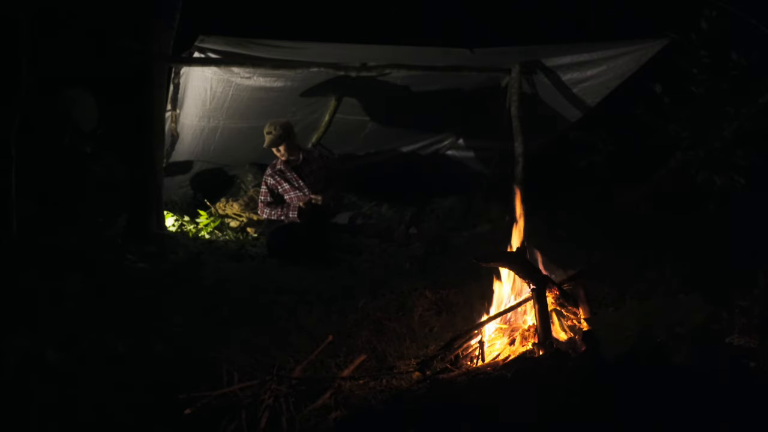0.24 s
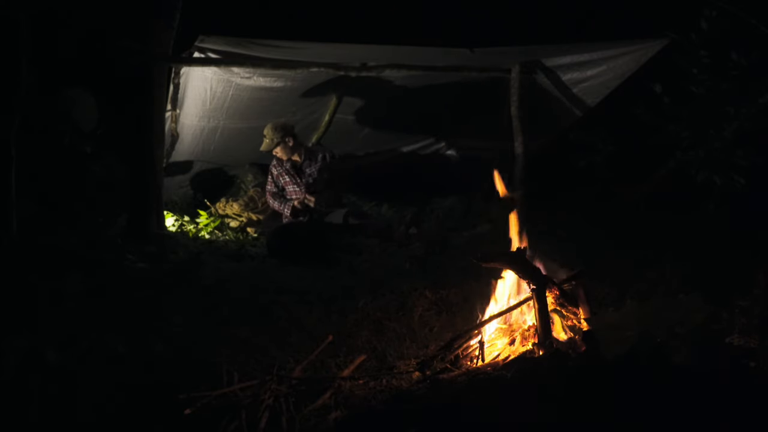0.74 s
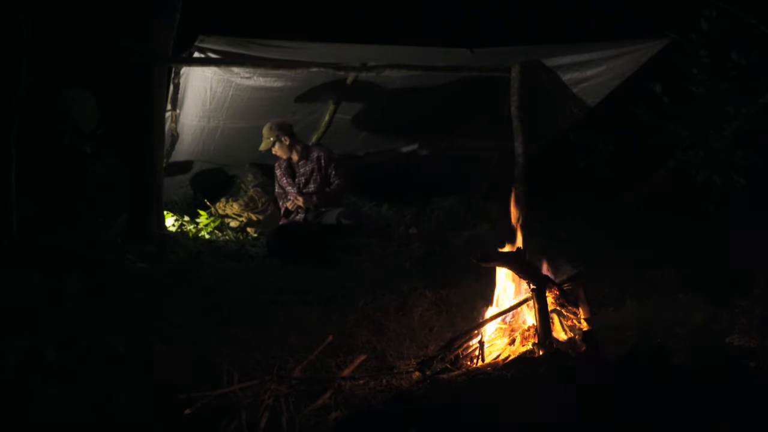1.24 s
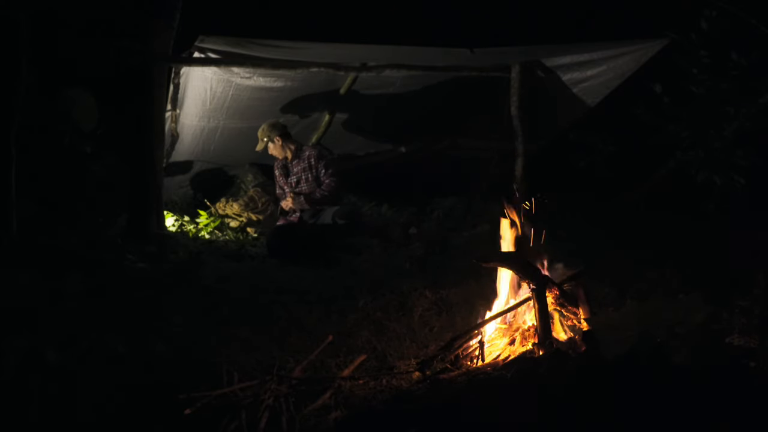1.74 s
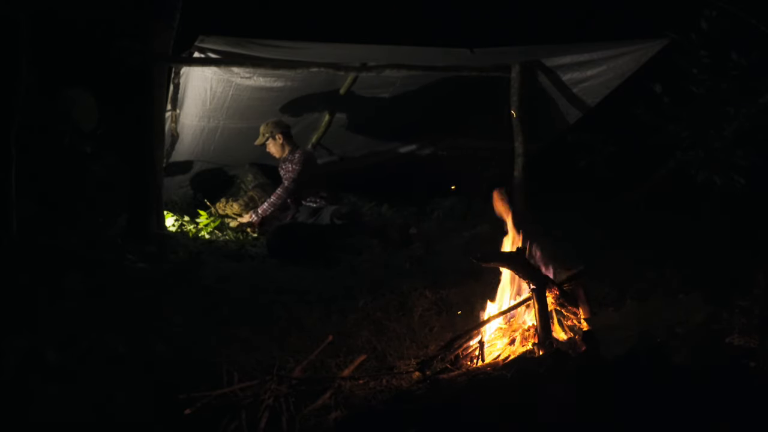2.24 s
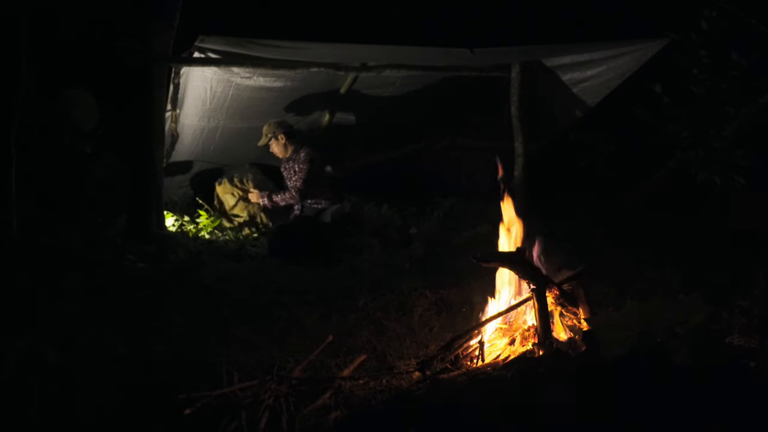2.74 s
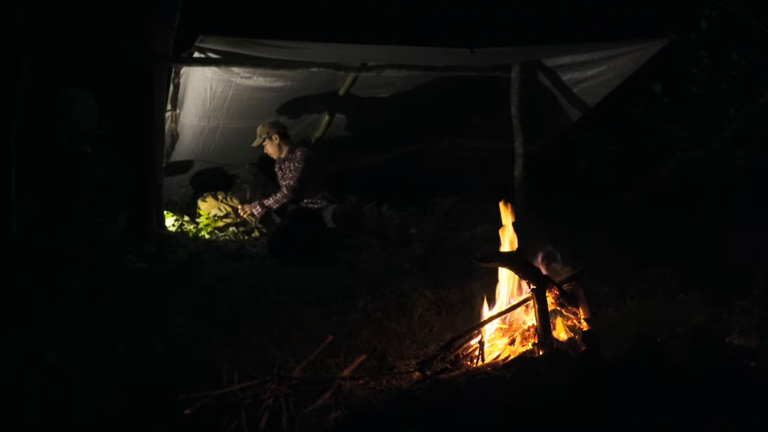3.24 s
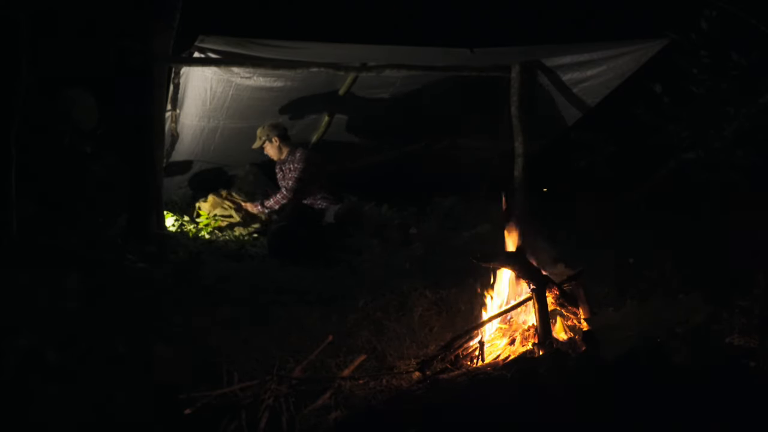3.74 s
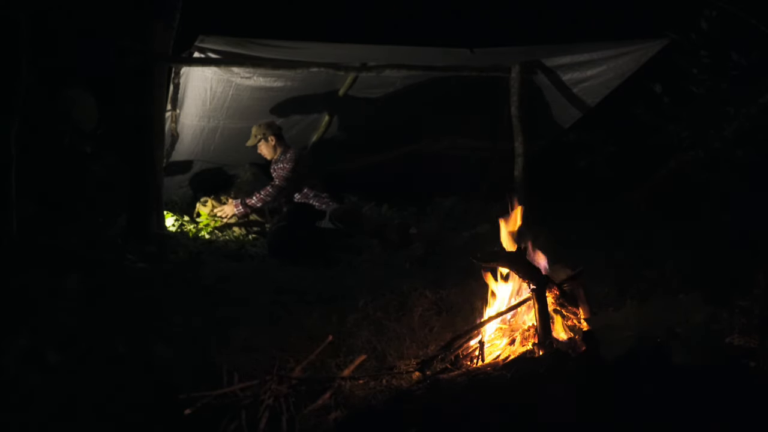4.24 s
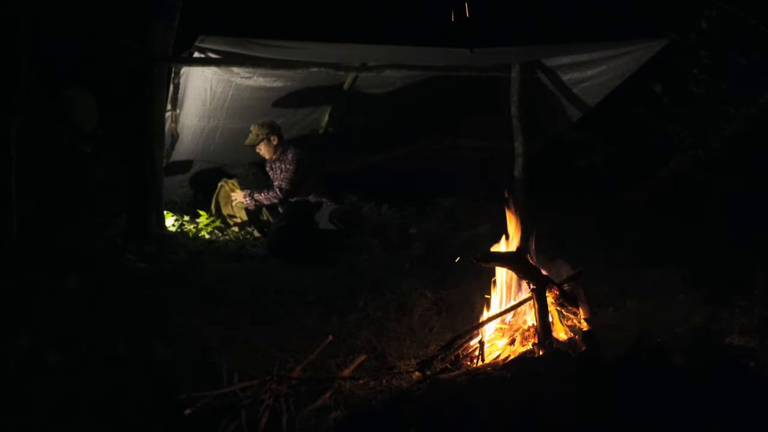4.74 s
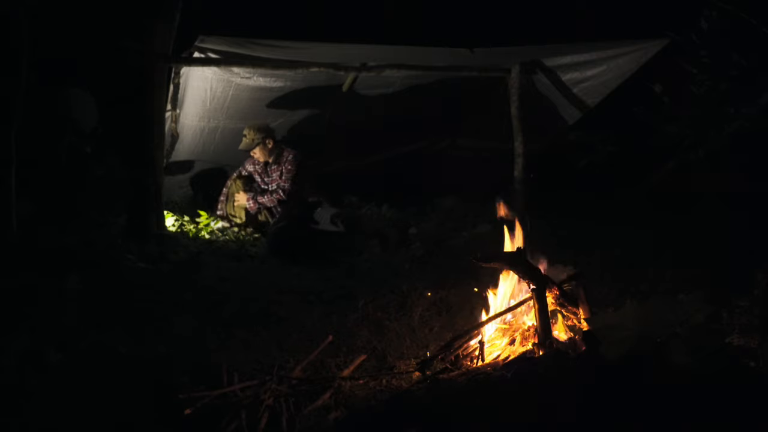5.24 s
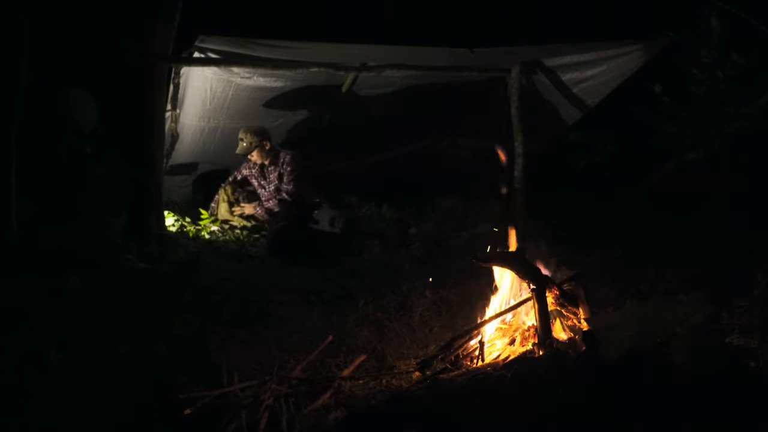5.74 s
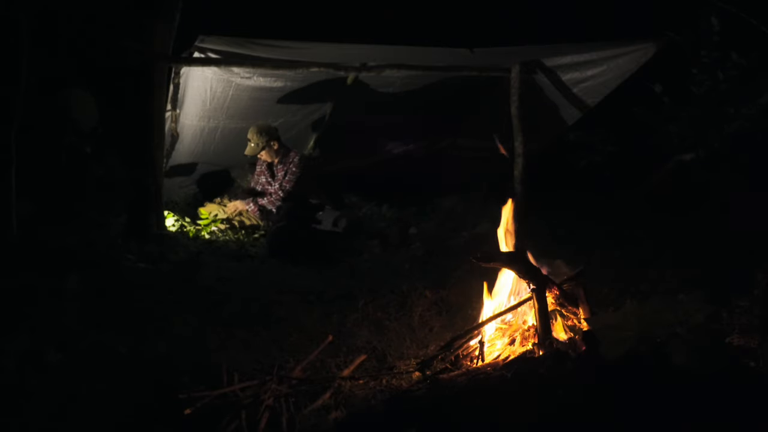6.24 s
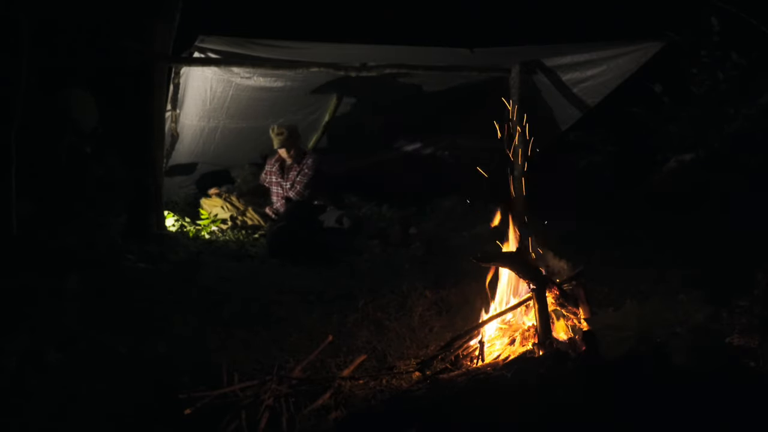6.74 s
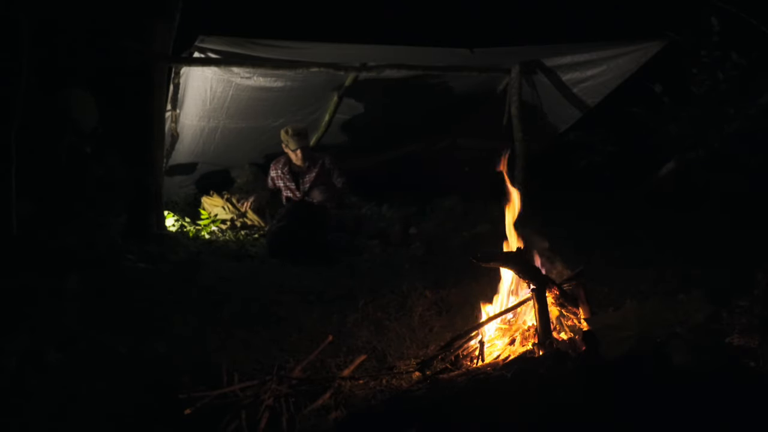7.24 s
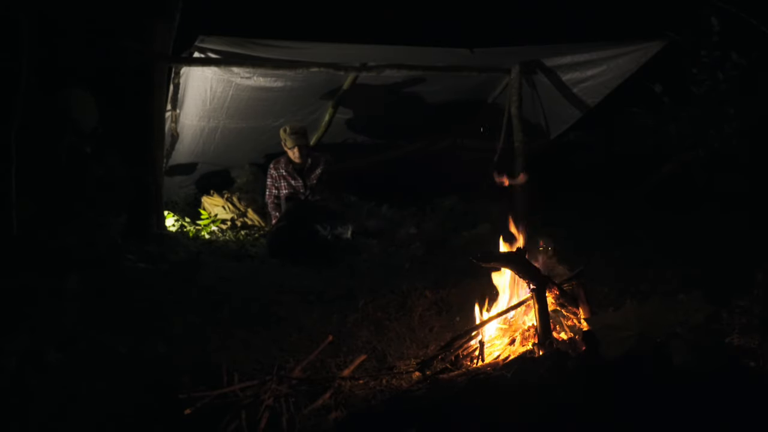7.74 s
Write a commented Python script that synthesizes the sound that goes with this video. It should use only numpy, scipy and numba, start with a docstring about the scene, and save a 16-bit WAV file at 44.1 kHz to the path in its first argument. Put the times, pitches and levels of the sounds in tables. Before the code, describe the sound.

A quiet night in the woods, with the microphone close to a wood fire. Throughout, many crickets sing: a distant high band, pulsing choirs and a nearer chirper, over faint air and flame hiss. Short bright trills stand out near 1.1, 1.5, 3.6, 5.2 and 5.9 s. Fire pops are dry and millisecond-short, with strong ones at 1.1, 1.36, 1.6, 4.3 and 6.66 s, smaller cracks and ticks between. Bag handling is faint until about 2.3 s, then cloth and leaves rustle in uneven clumps, busiest from 4.3 to 6 s. Soft dull thuds fall around 3.1, 3.5, 4.1, 5.3 and 6.2 s. At 6.31 s a hard hollow object smacks down in a rapid stuttering contact, the loudest bump, and its contents rattle and slide for a fraction of a second. Lighter rustles, small bumps and pops continue to 8 s. Tarp and trunks give a short diffuse echo.

```python
"""Night woods, fire and bag

Under a tarp in the woods, with a wood fire popping close to the microphone: noise bursts in four bands.
A cloth bag on leaf bedding rustles (grains) and thuds (noise lumps); a hard thing in it smacks down (modes).
Crickets near and far sing in strokes of falling tones, over a noise bed of air, flame and hiss.
Trees and tarp send back a short diffuse echo of every blow, made with a decaying noise tail."""
import sys
import numpy as np
from scipy import signal
from scipy.fft import rfft, irfft
from scipy.io import wavfile
from numba import njit

SR = 44100
rng = np.random.default_rng(int(sys.argv[2]) if len(sys.argv) > 2 else 0)


def materialize(psi):
    """Save the field psi as 16-bit PCM at rate SR to the path in sys.argv[1].

    A 1-D psi becomes a single channel; in a 2-D psi each row is a channel.
    """
    bounded = np.clip(np.atleast_2d(psi).T, -1, 1)
    quanta = np.round(bounded * 32767).astype(np.int16)
    wavfile.write(sys.argv[1], SR, quanta)


N = 352359

# air, flame and hiss: f/Hz, relative density/dB per Hz
NIGHT_SPECTRUM = [(20, -12), (50, -4), (120, 5.5), (300, 2.5), (1500, -11), (4000, -9.5), (7000, -7),
                  (12000, -19), (16000, -11.5)]
NIGHT_DB = -68.5   # rms before its slow drift
# countless far crickets melted into a band: low f/Hz, high f/Hz, rms level/dB
FAR_CRICKETS = (4360, 5480, -66)
# thin, high patches of hiss: t/s, length/s, centre f/Hz, rms level before the swell/dB
HISS_PATCHES = [(0.0, 0.077, 10800, -66), (0.075, 0.2, 10700, -68.5), (0.322, 0.11, 12700, -64.5),
                (0.44, .1, 12100, -68), (6.136, 0.15, 11200, -69)]
PATCH_HALF_WIDTH = .1   # share of the centre frequency
# cricket choirs: singers, wing f/Hz, spread to either side/Hz, strokes/s, stroke/s, glide/Hz, rms level/dB
CRICKET_CHOIRS = [(7, 3400, 50, 48, 0.018, 62, -61), (8, 4800, 320, 28.5, .011, 300, -70),
                  (2, 5230, 40, 28.5, .012, 460, -71.5), (4, 6210, 59, 74, 0.015, 44, -70),
                  (3, 6630, 33, 57, .014, 40, -73)]
# near cricket, strokes in groups: f/Hz, strokes/s, chirps/s, stroke/s, rms level/dB
NEAR_CHIRPER = (5705, 38.8, 9.7, .0205, -65.5)
# short trills of single crickets: t/s, length/s, starting f/Hz, rms level before shaping and scatter/dB
TRILLS = [(0.41, 0.11, 6200, -60), (1.005, 0.047, 6300, -58), (1.116, 0.15, 6390, -52.5),
          (1.53, .15, 6360, -48.5), (1.896, 0.14, 6200, -63), (3.587, 0.2, 6370, -51),
          (3.845, 0.078, 6470, -51), (5.199, 0.16, 6390, -53), (5.784, 0.07, 6100, -54),
          (5.897, 0.16, 6260, -50), (6.12, 0.085, 6370, -52.5), (6.82, 0.12, 6360, -53),
          (6.83, 0.13, 6520, -61), (7.8, 0.14, 6410, -53)]
SMEAR_S, SMEAR_SHARE = .03, 0.29   # decay constant and gain of the scatter off trunks and leaves
# how hard the bag is handled: t/s, rustle level/dB (only the departure from the mean counts)
BAG_HANDLING = [(0.0, -69.5), (0.87, -68.5), (1.51, -67.5), (2.2, -70.5), (2.32, -62.5), (2.49, -63),
                (2.91, -62), (3.3, -63.5), (3.69, -61.5), (3.94, -60), (4.2, -68), (4.36, -56), (4.46, -65),
                (4.6, -56), (4.75, -60.5), (4.88, -59.5), (4.93, -66), (5.2, -64), (5.35, -55.5),
                (5.5, -61), (5.78, -59), (5.97, -61.5), (6.05, -66.5), (6.3, -65), (6.45, -63),
                (6.81, -66.5), (7.2, -61), (7.5, -70.5), (7.8, -62), (7.99, -63)]
# cloth rustle: f/Hz, relative density/dB per Hz
CLOTH_SPECTRUM = [(35, -39.5), (60, -19), (155, -4), (484, -2.5), (629, -0.5), (794, -9), (874, -5),
                  (1600, -11.5), (2080, -53.5), (3520, -120)]
CLOTH_DB, LEAVES_DB, HISS_DB = -68, -66, -71   # at mean handling; the cloth before its clumps
CLOTH_FOLLOWS, LEAVES_FOLLOW, HISS_FOLLOWS = 1.57, 1.22, 0.95   # dB per dB of handling
# bag against ground and gear: t/s, peak level of the body/dB, body f/Hz, length/s
BAG_THUDS = [(0.625, -54, 350, 0.0091), (2.452, -47.5, 300, 0.011), (2.555, -48.5, 350, 0.039),
             (2.735, -49.5, 427, 0.11), (3.066, -44, 460, 0.093), (3.109, -33, 676, 0.021),
             (3.332, -48, 400, 0.034), (3.416, -48.5, 464, 0.021), (3.492, -36, 755, 0.015),
             (4.036, -42, 666, 0.028), (4.08, -33, 800, 0.014), (4.546, -41.5, 513, 0.013),
             (4.576, -49, 650, 0.01), (4.821, -52, 580, 0.1), (4.874, -47, 2520, 0.035),
             (5.152, -49, 600, 0.0065), (5.213, -45, 596, 0.024), (5.256, -42, 645, 0.095),
             (5.301, -35.5, 590, 0.046), (5.50, -38, 523, 0.0087), (6.233, -34.5, 456, 0.022),
             (6.25, -33, 433, 0.021), (6.789, -49.5, 252, 0.019), (7.079, -44.5, 470, 0.034),
             (7.132, -41.5, 557, 0.02), (7.292, -55, 260, 0.031), (7.757, -41, 552, 0.011)]
SNAP_DB, SNAP_DB_PER_DOUBLING = -8.5, 3.5   # snap of a 20 ms contact; a longer one drags over more leaves
# a hard hollow thing lands unevenly: t/s, level/dB
SMACK_CONTACTS = [(6.312, -25.5), (6.3143, -18.5), (6.3171, -10.5), (6.3196, -14)]
# what it rings with: f/Hz, level relative to the contact/dB, t60/s
HOLLOW_MODES = [(150.2, -18, 0.041), (306, -4, 0.036), (629, -9.5, 0.022), (800, -12.5, 0.039),
                (995, 3, 0.013), (1317, -12, 0.0236), (2064, -11.5, 0.024), (2225, -6, .03),
                (2460, -11.5, 0.025), (3070, -8, 0.0087), (3540, -11.5, 0.01), (4180, -9, 0.0058),
                (5360, -8.5, 0.003)]
# after the smack the contents jolt, slide on for a while and come to rest
JOLT_S, JOLT_DB, JOLT_T60_S = 6.322, -36.5, 0.073
SLIDE_DB, SLIDE_S, REST_DB_PER_S = -51, 0.093, 124.5
# fire pops: t/s, peak level of the top band before the shared colour/dB, brightness/dB per octave
FIRE_POPS = [(0.1703, -50, 12), (0.2227, -43.5, 4.5), (0.3502, -34.5, 1), (0.5918, -44.5, 9),
             (0.7267, -46, 4), (1.0522, -38.5, 5.5), (1.1042, -19, 1.13), (1.2971, -34.5, 12),
             (1.36, -13, 2.4), (1.4161, -32, 1.5), (1.5971, -14, 5.5), (1.7275, -29.5, 2), (1.9293, -24, 7),
             (1.945, -38, 11), (2.0568, -41.5, 5.5), (2.754, -36, 6), (3.4424, -27, 3), (3.611, -42, 10),
             (3.8301, -40, -0.5), (3.924, -31.5, 5), (4.1391, -28.5, 6.5), (4.3144, -17, 1.83),
             (4.6669, -21.5, 6), (5.4555, -21.5, 4.5), (5.5946, -43, -4), (5.616, -43, 9), (5.678, -32, 5),
             (5.942, -43, 3), (6.273, -34.5, 3), (6.6292, -30.5, 6), (6.6565, -13, 3), (7.0575, -30.5, 5.5),
             (7.082, -37.5, 5.5), (7.4694, -40.5, -1), (7.4751, -27.5, 2), (7.6632, -28, 5.5),
             (7.713, -41, 3.5)]
# bands of a pop: low f/Hz, high f/Hz
POP_BANDS = [(300, 1450), (1600, 3200), (4300, 7000), (7000, 13000)]
# colour all pops share: level/dB, one per band
POP_COLOUR = [-0.6, 1, -2, -0.9]
GROUND_S, GROUND_SHARE = .00031, 0.05   # delay and gain of each pop's inverted ground bounce
ECHO_DB, ECHO_T60_S, ECHO_WAIT_S = -8.5, 0.28, .013   # t60 before the further fades
TREBLE_FADE_S = 0.27   # extra fade of the echo's treble, to about a third in this time
CUTOFF_HZ = 16600


def from_db(db):
    """Decibels to gain."""
    return 10 ** (np.asarray(db) / 20)


def rms_one(x):
    """Scale to rms 1."""
    return x / np.sqrt(np.mean(x ** 2) + 1e-20)


def peak_one(x):
    """Scale each row to peak 1."""
    return x / np.abs(x).max(axis=-1, keepdims=True)


def in_time(rows):
    """Columns of a curve, one value per sample."""
    s, *columns = np.transpose(rows)
    return [np.interp(np.arange(N) / SR, s, c) for c in columns]


def band(x, low_hz, high_hz):
    """Butterworth band-pass."""
    edges_hz = [low_hz, min(high_hz, .45 * SR)]
    return signal.sosfilt(signal.butter(2, edges_hz, "band", fs=SR, output="sos"), x)


def coloured(x, spectrum):
    """Shape a steady signal to a spectrum, interpolated over log frequency; rms 1."""
    hz, level_db = np.transpose(spectrum)
    grid = np.log(np.fft.rfftfreq(N, 1 / SR) + 1)
    gain = from_db(np.interp(grid, np.log(hz), level_db))
    return rms_one(irfft(rfft(x) * gain, N))


def drift(rate):
    """Slow random curve: knots of spread 1, so many per second, joined by straight lines."""
    knots = rng.standard_normal(int(N / SR * rate) + 2)
    return np.interp(np.arange(N) / SR * rate, np.arange(len(knots)), knots)


def grains(per_s, spread_db):
    """Random clicks of either sign; a larger spread makes their sizes more uneven."""
    size_db = spread_db * np.minimum(rng.exponential(1, N), 4)
    sizes = from_db(size_db) * rng.choice([-1, 1], N)
    return sizes * (rng.random(N) < per_s / SR)


def place(out_len, events):
    """Lay short sounds at their times."""
    out = np.zeros(out_len + SR)
    for s, sound in events:
        start = round(s * SR)
        out[start:start + len(sound)] += sound
    return out[:out_len]


def night_air():
    """Air, flame and hiss: coloured noise whose level drifts slowly."""
    level = from_db(NIGHT_DB + 0.74 * drift(3.5))
    return level * coloured(rng.standard_normal(N), NIGHT_SPECTRUM)


def far_crickets():
    """So many distant singers that their strokes merge into a steady band of noise."""
    low_hz, high_hz, level_db = FAR_CRICKETS
    far = band(band(rng.standard_normal(N), low_hz, high_hz), low_hz, high_hz)
    return from_db(level_db) * rms_one(far)


def high_hiss():
    """Each patch is a narrow band of noise that swells and fades."""
    t = np.arange(SR // 2) / SR
    patches = []
    for s, length_s, hz, level_db in HISS_PATCHES:
        swell = np.sqrt(np.sin(np.pi * np.clip(t / length_s, 0, 1)).clip(0))
        noise = rng.standard_normal(len(t))
        hiss = rms_one(band(noise, hz * (1 - PATCH_HALF_WIDTH), hz * (1 + PATCH_HALF_WIDTH)))
        patches.append((s, from_db(level_db) * swell * hiss))
    return place(N, patches)


@njit
def wing(pace, hz, per_s, stroke_s, glide_hz):
    """Each wing stroke is a short tone falling in pitch; pace is the singer's own clock in seconds."""
    out, phase = np.zeros(len(pace)), 0.
    for i in range(len(pace)):
        through = pace[i] * per_s % 1 / (per_s * stroke_s)   # 0 to 1 within the stroke
        if through < 1:
            phase += 2 * np.pi * (hz[i] + glide_hz * (.5 - through)) / SR
            out[i] = np.sin(phase) * np.sqrt(4 * through * (1 - through))
    return out


def strokes(hz, per_s, stroke_s, glide_hz):
    """A singer whose tempo and pitch waver a little; also returns its clock."""
    pace = rng.random() + np.arange(N) / SR + .003 * drift(4)
    return wing(pace, hz + 14 * drift(25), float(per_s), stroke_s, float(glide_hz)), pace


def smear(x):
    """A dense short scatter off trunks and leaves fills the gaps between strokes."""
    t = np.arange(SR // 8) / SR
    scatter = rms_one(rng.standard_normal(len(t)) * np.exp(-t / SMEAR_S)) / np.sqrt(len(t))
    return x + SMEAR_SHARE * signal.fftconvolve(x, scatter)[:N]


def choirs():
    """Unsynchronised singers, spread in pitch and tempo, each varying in loudness."""
    out = np.zeros(N)
    for singers, hz, spread_hz, per_s, stroke_s, glide_hz, level_db in CRICKET_CHOIRS:
        choir = np.zeros(N)
        for p in np.linspace(-1, 1, round(singers)):
            tempo = per_s * (1 + .015 * rng.standard_normal())
            song, _ = strokes(hz + spread_hz * p, tempo, stroke_s, glide_hz)
            choir += song * np.abs(1 + 0.5 * drift(4))
        out += from_db(level_db) * rms_one(choir)
    return out


def near_chirper():
    """A near cricket's strokes rise and fall in groups, heard with their scatter."""
    hz, per_s, chirps, stroke_s, level_db = NEAR_CHIRPER
    song, pace = strokes(hz, per_s, stroke_s, glide_hz=35)
    chirp = from_db(4.4 * np.cos(2 * np.pi * pace * chirps) + 1.6 * drift(35))
    return from_db(level_db) * rms_one(smear(song * chirp * from_db(1.2 * drift(6))))


def trills():
    """Single crickets trill briefly, rising 40 Hz with strokes of uneven strength, and scatter."""
    events = []
    for s, length_s, hz, level_db in TRILLS:
        t = np.arange(round(length_s * SR)) / SR
        song = rms_one(wing(t, hz + 40 * t / length_s, 56.0, 0.017, 80.0))
        swell = np.sin(np.pi * t / length_s) ** 0.3
        strength = rng.uniform(0.14, 0.69, 40)[(t * 56).astype(int)]   # one per stroke
        events.append((s, from_db(level_db) * song * swell * strength))
    return smear(place(N, events))


def rustle():
    """Cloth folds low, leaves crush in the middle and hiss on top; all come in clumps of grains."""
    effort_db = in_time(BAG_HANDLING)[0]
    effort_db = effort_db - effort_db.mean()
    clumps_db = 2.5 * drift(40) + 2.05 * drift(16)
    folds = coloured(grains(700, spread_db=0), CLOTH_SPECTRUM)
    cloth = folds * from_db(CLOTH_DB + CLOTH_FOLLOWS * effort_db + clumps_db)
    crush = grains(2500, spread_db=1.0) * from_db(clumps_db)
    leaves = rms_one(band(crush, 1820, 3800)) * from_db(LEAVES_DB + LEAVES_FOLLOW * effort_db)
    hiss = rms_one(band(crush, 3500, 12000)) * from_db(HISS_DB + HISS_FOLLOWS * effort_db)
    return cloth + leaves + hiss


def thuds():
    """A soft contact is a lump of noise in a broad body resonance, with a brighter snap on it."""
    t = np.arange(5000) / SR
    sounds = []
    for s, peak_db, hz, length_s in BAG_THUDS:
        press = np.sin(np.pi * np.clip(t / max(length_s, .002), 0, 1) ** 0.61)
        contact = rng.standard_normal(len(t)) * press
        body = peak_one(band(band(contact, 0.5 * hz, 1.41 * hz), 0.24 * hz, 1.94 * hz))
        snap_db = SNAP_DB + SNAP_DB_PER_DOUBLING * np.log2(length_s / 0.02)
        snap = from_db(snap_db) * peak_one(band(contact, 1230, 3600))
        sounds.append((s, from_db(peak_db) * (body + snap)))
    return place(N, sounds)


def smack():
    """Four contacts strike the same decaying modes, each mode with random sign and strength."""
    out = np.zeros(N)
    at, blow_db = np.transpose(SMACK_CONTACTS)
    for hz, level_db, t60 in HOLLOW_MODES:
        clicks = np.full(N, 1e-18)   # inaudible floor
        strength_db = blow_db + level_db + rng.normal(0, 2.1, len(at))
        clicks[np.round(at * SR).astype(int)] = from_db(strength_db) * rng.choice([-1, 1], len(at))
        r, w = from_db(-60 / (t60 * SR)), 2 * np.pi * hz / SR
        out += signal.lfilter([0, np.sin(w)], [1, -2 * r * np.cos(w), r * r], clicks)
    return band(band(out, 110, 13750), 70, 15000)


def settling_contents():
    """The contents jolt and slide to rest: grains in two bands under a falling level."""
    knocks = grains(4000, spread_db=1.5)
    rattle = rms_one(band(knocks, 490, 1100)) - 0.79 * rms_one(band(knocks, 1600, 2900))
    since = np.maximum(np.arange(N) / SR - JOLT_S, 0)
    jolt = from_db(JOLT_DB - 60 * since / JOLT_T60_S)
    slide = from_db(SLIDE_DB - REST_DB_PER_S * np.maximum(since - SLIDE_S, 0))
    return (since > 0) * (jolt + slide) * rattle


def pops():
    """A gas pocket bursts the wood: a push and splinters within a millisecond; bright pops lack the low push."""
    t, rows = np.arange(500) / SR, np.array(FIRE_POPS)
    splinters = rng.standard_normal((len(rows), len(t))) * np.exp(-t / 0.00045)
    bursts = splinters + 4.6 * (t == 0)
    lag = round(GROUND_S * SR)
    bursts[:, lag:] -= GROUND_SHARE * bursts[:, :-lag]
    octaves = np.log2(np.sqrt(np.prod(POP_BANDS, axis=1)))   # band centres
    level_db = rows[:, [1]] + rows[:, [2]] * (octaves - octaves[-1]) + POP_COLOUR
    sounds = np.zeros(bursts.shape)
    for k, (low_hz, high_hz) in enumerate(POP_BANDS):
        sign = (-1) ** k   # neighbouring bands join without a notch when their signs alternate
        sounds += sign * from_db(level_db[:, [k]]) * peak_one(band(bursts, low_hz, high_hz))
    return place(N, zip(rows[:, 0], sounds))


def ticking():
    """Faint ticking between the pops: sparse clicks of very uneven size."""
    return from_db(-64) * band(grains(25, spread_db=8.0), 1500, 14000)


def woods(x):
    """Logs scatter at once; the diffuse echo from tarp and trunks comes after a wait and loses its treble."""
    t = np.arange(SR // 2) / SR
    logs = 2.08 * np.exp(-t / 0.0054)
    late = 0.64 * (t > ECHO_WAIT_S) / (1 + (t / 0.2) ** 3)
    noise = rng.standard_normal(len(t)) * (logs + .3 + late)
    low = band(noise, 250, 6000)
    rest = (noise - low) * np.exp(-t / TREBLE_FADE_S)
    tail = (low + rest) * from_db(-60 * t / ECHO_T60_S)
    return from_db(ECHO_DB) * signal.fftconvolve(x, tail / np.sqrt(np.sum(tail ** 2)))[:N]


def scene():
    """Blows with their echo over crickets, high hiss, rustle and night air."""
    background = night_air() + far_crickets() + high_hiss()
    crickets = choirs() + near_chirper() + trills()
    bumps = thuds() + smack() + settling_contents()
    crackle = pops() + ticking()
    echo = woods(crackle + 1.12 * bumps)
    return (background + crickets + rustle() + bumps + crackle + echo)[None]


def record(dry):
    """The top steps down at 15.6 kHz and is then cut."""
    top = signal.sosfilt(signal.cheby2(10, 16, 15600, fs=SR, output="sos"), dry)
    return signal.sosfilt(signal.cheby2(12, 60, CUTOFF_HZ, fs=SR, output="sos"), top)


dry = scene()
out = record(dry)
materialize(out)
```